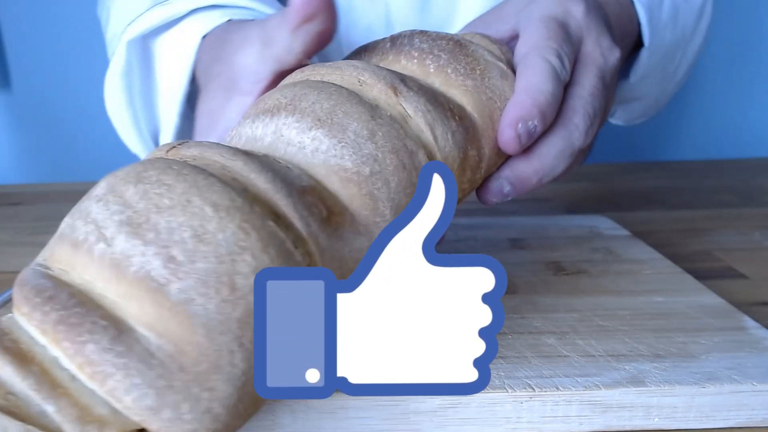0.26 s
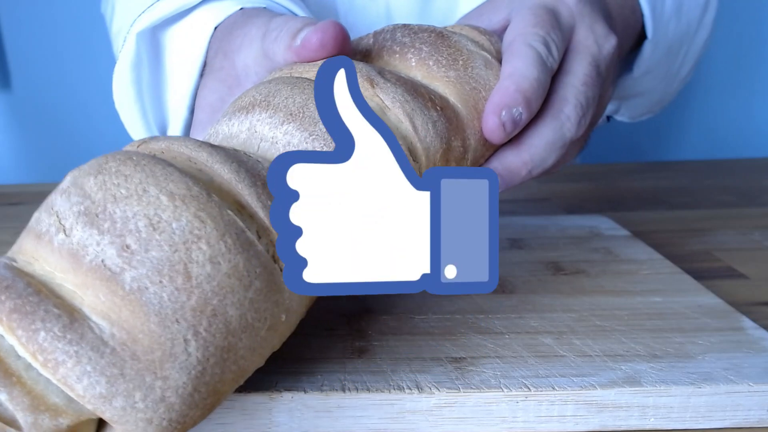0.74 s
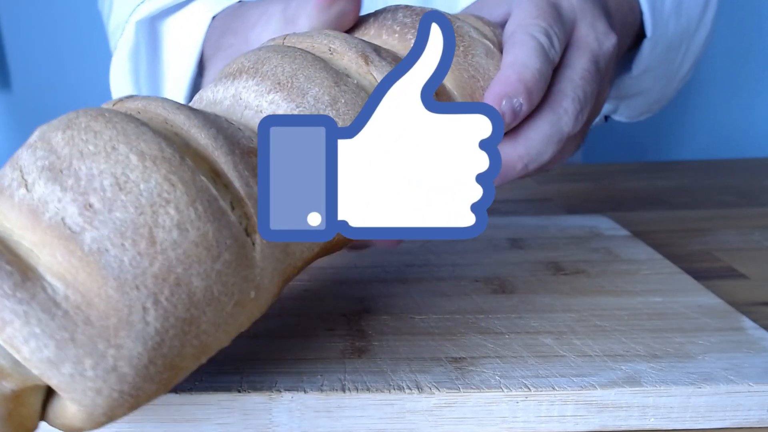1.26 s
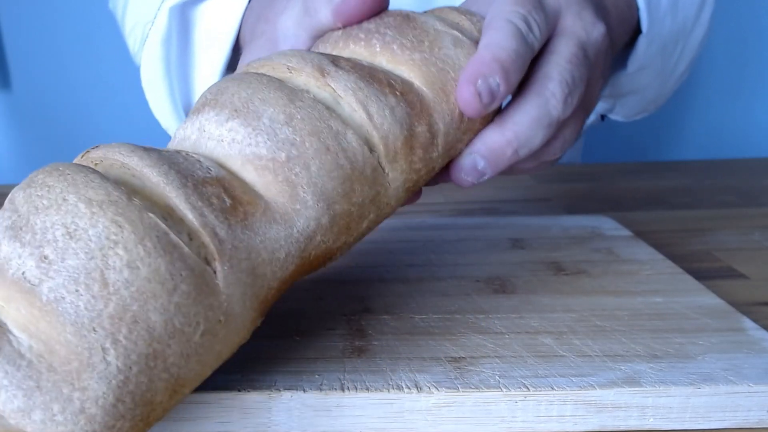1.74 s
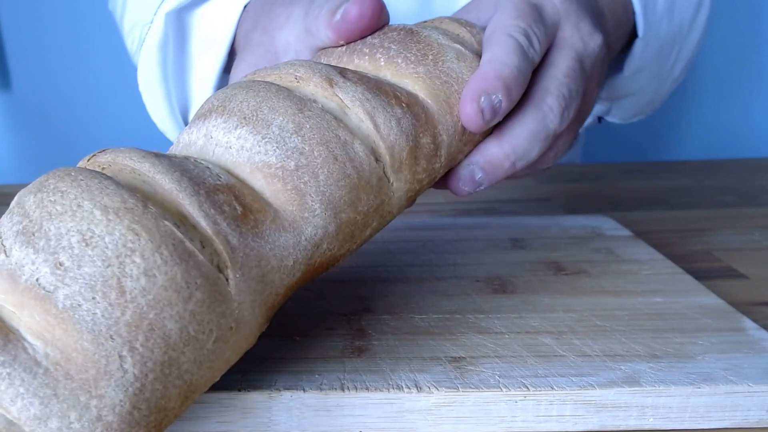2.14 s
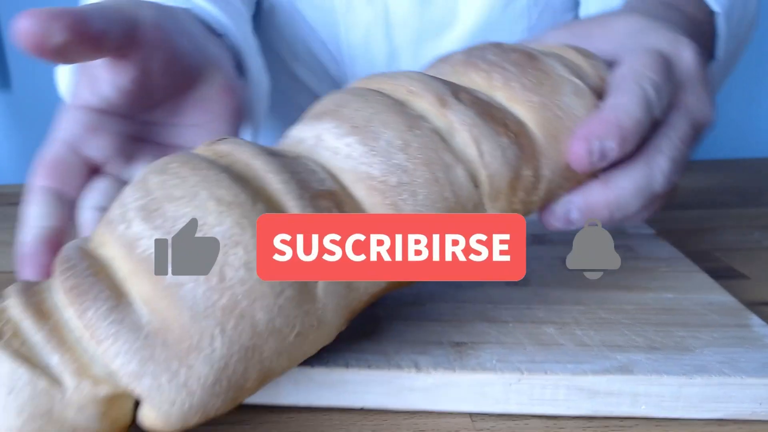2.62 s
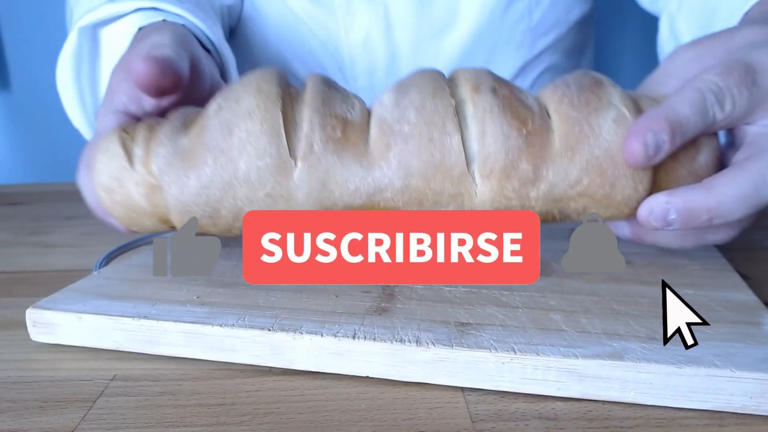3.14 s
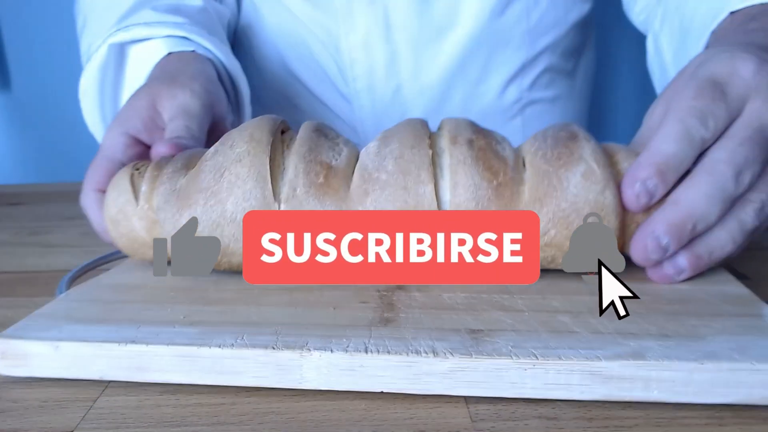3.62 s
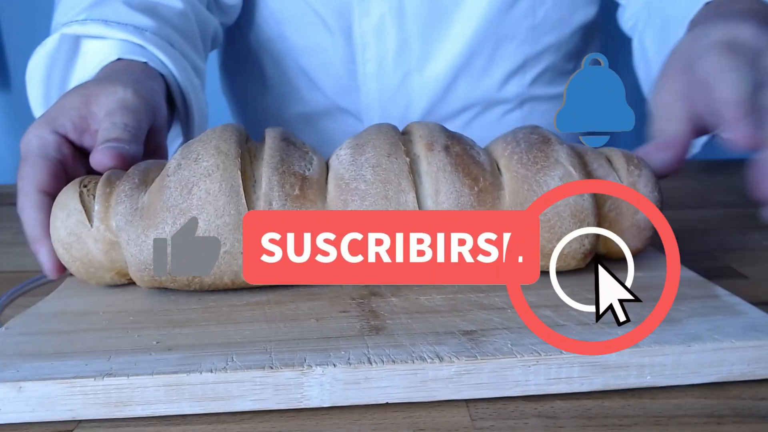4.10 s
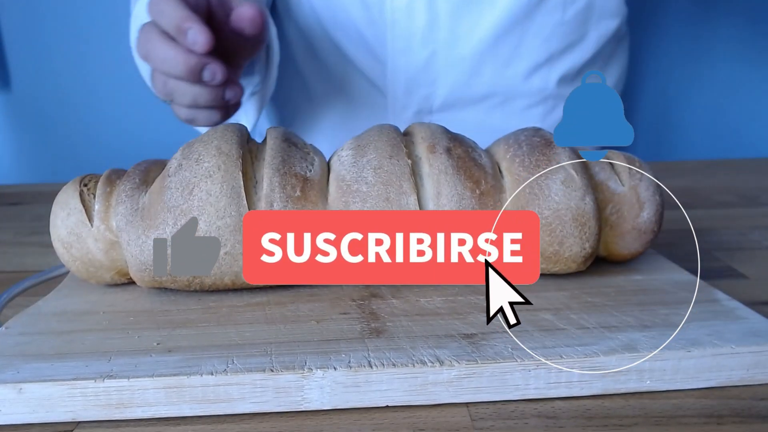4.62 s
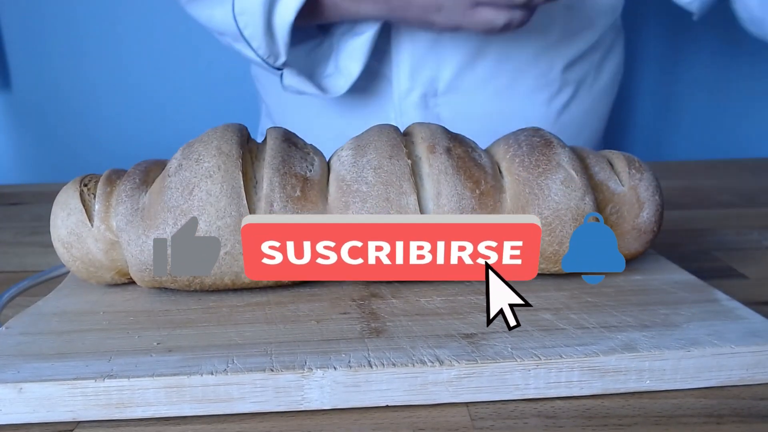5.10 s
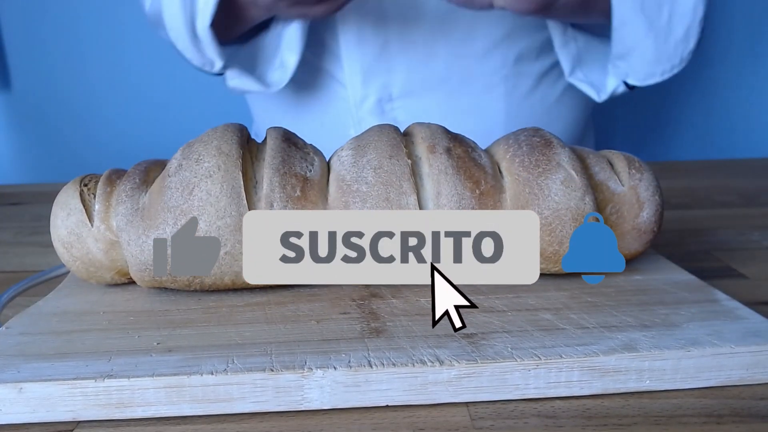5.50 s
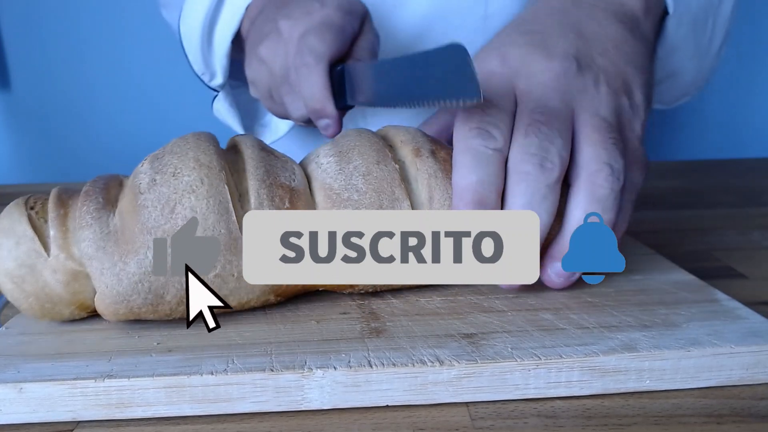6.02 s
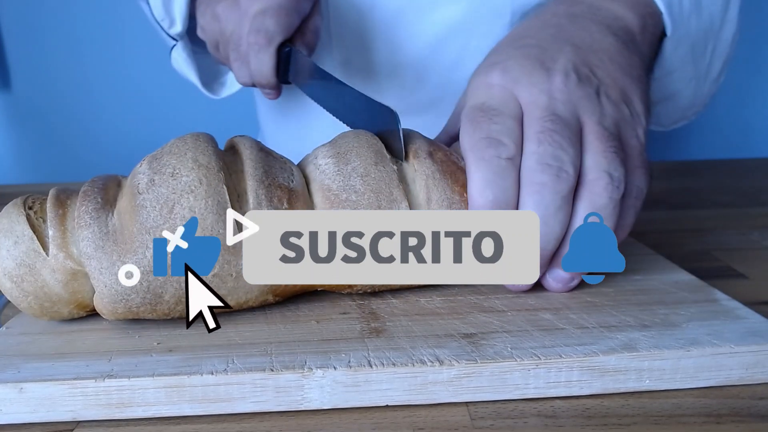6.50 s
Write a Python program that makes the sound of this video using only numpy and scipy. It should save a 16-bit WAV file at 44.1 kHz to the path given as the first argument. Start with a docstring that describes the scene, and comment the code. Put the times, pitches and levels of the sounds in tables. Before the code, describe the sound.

Close microphone in a small kitchen. Fingers rap a quick hollow roll on a crusty loaf, then squeezing brings bright, irregular crackles and one sharper crunch. A louder roll of taps follows, and a second, finer crackle. The loaf scrapes as it is turned, bumps down on a wooden board and shifts. A knife rattles faintly as it is picked up, a palm brushes the crust, and serrated teeth begin rasping in two growing strokes.

```python
"""A crusty loaf on a wooden board in a small kitchen, heard close up.
First fingers drum on the hollow loaf (damped bursts and soft blows), then squeeze it until the crust
crackles (random tiny fractures). More drumming and squeezing follow; the loaf slides as it is turned,
is set down and tapped. A knife knocks and scrapes as it is picked up (slips ringing its resonances),
a palm settles on the loaf, and the serrated edge starts to saw into the crust (slips grouped by teeth)."""
import sys
import numpy as np
from scipy import signal
from scipy.fft import rfft, irfft
from scipy.io import wavfile

SR = 44100
rng = np.random.default_rng(int(sys.argv[2]) if len(sys.argv) > 2 else 0)


def wav_record(signal):
    """Record a signal, one row per channel, as 16-bit PCM in the file named by sys.argv[1]."""
    frames = np.transpose(np.atleast_2d(signal))
    bounded = np.clip(frames, -1, 1)
    # unit amplitude maps onto the largest positive 16-bit level
    quanta = np.round(bounded * 32767).astype(np.int16)
    wavfile.write(sys.argv[1], SR, quanta)


N = 297675
TIME = np.arange(N) / SR   # seconds

# In the tables below, levels are relative: the functions also set an overall level for each layer.


def from_db(db):
    """Turn decibels into gain."""
    return 10 ** (np.asarray(db) / 20)


def rms_one(x):
    """Scale a signal to rms 1."""
    return x / np.sqrt(np.mean(x ** 2) + 1e-20)


def at_hz(points, hz):
    """Read a table between its points, on a log-frequency axis."""
    known_hz, values = np.transpose(points)
    return np.interp(np.log(np.maximum(hz, 1)), np.log(known_hz), values)


def drift(rate):
    """Random wandering: draws of spread 1, this many per second, joined by straight lines."""
    knots = rng.standard_normal(4096)
    return np.interp(TIME * rate, np.arange(len(knots)), knots)


def pulse(spectrum, size=4096):
    """The most compact causal pulse with this spectrum (minimum phase); peak 1."""
    gains = from_db(at_hz(spectrum, np.fft.rfftfreq(size, 1 / SR)))
    cepstrum = irfft(np.log(gains))
    # folding the cepstrum forward in time makes the pulse causal
    cepstrum[1:size // 2] *= 2
    cepstrum[size // 2 + 1:] = 0
    shape = irfft(np.exp(rfft(cepstrum)))
    return shape / np.abs(shape).max()


def through(x, response):
    """Pass a signal through an impulse response."""
    return signal.oaconvolve(x, response)[:N]


def coloured(x, spectrum):
    """Give a steady excitation a colour; rms 1."""
    return rms_one(through(x, pulse(spectrum)))


def add(track, s, sound):
    """Mix a sound into a track at a time in seconds."""
    start = max(round(s * SR), 0)
    track[start:start + len(sound)] += sound[:max(N - start, 0)]


def blows(times, levels_db):
    """One single-sample click per blow."""
    clicks = np.zeros(N)
    places = np.clip(np.round(times * SR).astype(int), 0, N - 1)
    clicks[places] = from_db(levels_db)
    return clicks


def fading(times, levels_db, decay_s):
    """An envelope that jumps at each contact and dies away exponentially."""
    keep_per_sample = np.exp(-1 / (decay_s * SR))
    return signal.lfilter([1], [1, -keep_per_sample], blows(times, levels_db) + 1e-18)


def burst(hz, cycles, size=1024):
    """A heavily damped piece of crust: swells for some cycles and soon dies; envelope peak 1."""
    turns = np.arange(size) / SR * hz
    envelope = turns / cycles * np.exp(1 - turns / cycles)
    return envelope * np.sin(2 * np.pi * turns)


def grains(per_s, spread_db):
    """Random tiny fractures of uneven size and either sign; rms 1."""
    sizes = from_db(spread_db * np.minimum(rng.exponential(1, N), 4))
    signs = rng.choice([-1, 1], N)
    return rms_one(sizes * signs * (rng.random(N) < per_s / SR))


def swell(start_s, attack_s, hold_s, release_s):
    """One movement of the hand: pressure builds, holds and eases along a power curve; peak 1."""
    rising = (TIME - start_s) / attack_s
    easing = (start_s + attack_s + hold_s + release_s - TIME) / release_s
    return np.clip(np.minimum(rising, easing), 0, 1) ** 1.9


def moves(rows):
    """A gain over time for each level column of a table of movements."""
    return sum(np.outer(from_db(row[4:]), swell(*row[:4])) for row in rows)


# Colour of the room air: (frequency [Hz], level [dB])
AIR_COLOUR = [(12, -33.5), (20, 7.5), (44, 5), (57, -9), (92, -10), (211, -10.5), (669, -21.5), (1280, -32),
              (2230, -30.5), (3010, -35.5), (6070, -35.5), (7420, -40.5), (8000, -55), (10400, -89),
              (17600, -120)]
# Low hum of the room: (frequency [Hz], level [dB])
HUM = [(26.5, -52), (47, -54.5), (100, -67)]
# Arm movements that rustle the sleeves:
# (start [s], attack [s], hold [s], release [s], level [dB])
SLEEVES = [(0, .14, .06, .3, -55), (2.6, .5, .35, .5, -55.5), (4.35, .3, .1, 1.7, -54),
           (5.45, .22, .03, .4, -55.5)]
# Colour of rustling cloth: (frequency [Hz], level [dB])
CLOTH = [(120, -33), (200, -5), (388, -9.5), (467, -3), (580, -8.5), (1290, -8.5), (2190, -19.5),
         (3030, -14.5), (6060, -33), (8000, -55), (10400, -68), (17600, -120)]
SLEEVES_REST_DB = -66   # faint rustle that never stops


def background(air_db, sleeves_db):
    """Room air, a wavering low hum and sleeves: noise coloured for air and cloth, plus sines."""
    air = from_db(air_db) * coloured(rng.standard_normal(N), AIR_COLOUR)
    hum = np.zeros(N)
    for hz, db in HUM:
        phase = 2 * np.pi * hz * TIME + 0.66 * drift(1.7)
        hum += np.sqrt(2) * from_db(db) * np.sin(phase)
    moving = from_db(sleeves_db) * moves(SLEEVES)[0]
    rustle = np.hypot(from_db(SLEEVES_REST_DB), moving)
    return air + hum + rustle * coloured(rng.standard_normal(N), CLOTH)


# How long the kitchen's tail lasts: (frequency [Hz], time to fall by 60 dB [s])
ROOM_T60 = [(100, .5), (260, 0.45), (700, 0.37), (1840, 0.38), (4850, 0.14)]
# How strong the tail is: (frequency [Hz], level [dB])
ROOM_LEVEL = [(60, -4.5), (200, -6.5), (900, -5.5), (1800, -12), (4000, -9.5), (8000, -21.5)]


def kitchen(x, first_echo_s):
    """Many mixed reflections: bands of noise that die away, soonest in the high treble."""
    t, tail = TIME[:SR * 3 // 4], 0
    edges = 40 * 2 ** np.arange(0, 8.5, .5)   # half-octave bands
    for low, high in zip(edges, edges[1:]):
        hz = np.sqrt(low * high)
        band_pass = signal.butter(2, [low, high], "band", fs=SR, output="sos")
        band = signal.sosfilt(band_pass, rng.standard_normal(len(t)))
        decay = np.exp(-np.log(1000) * t / at_hz(ROOM_T60, hz))
        build_up = 1 - np.exp(-(t / first_echo_s) ** 2)
        gain = np.sqrt(2 * (high - low) / SR / len(t)) * from_db(at_hz(ROOM_LEVEL, hz))
        tail = tail + rms_one(band * decay * build_up) * gain
    return through(x, tail)


# Ringing of loaf and board: (frequency [Hz], level [dB], time to fall by 60 dB [s])
BOARD_MODES = [(68.4, -7.5, .3), (103, -5, .2), (144.75, 5, 0.52), (196.5, -0.5, 0.2), (225, -3, 0.32),
               (262.3, -1, 0.4), (377, -25.5, 0.42), (435, 4.5, 0.22), (462, -10, 0.5), (529.6, -15, 0.2),
               (515, -6.5, .3), (603.5, 2.5, .25), (817, -16, .26), (891, -1, .27), (1003, -5.5, 0.27),
               (1009, -3.5, .25), (1190, -9.5, .2), (1415, -10, 0.23), (1616, -10, .2), (1690, -4, .18),
               (1700, -5.5, .18)]


def board(x, level_db):
    """Loaf and board ring on, as fading sines, after whatever shakes them."""
    t = TIME[:SR // 2]
    ringing = sum(from_db(db - 60 * t / t60) * np.sin(2 * np.pi * hz * t) for hz, db, t60 in BOARD_MODES)
    return from_db(level_db) * through(x, ringing)


# The knife knocks as it is picked up, further away: (time [s], level [dB])
KNIFE_KNOCKS = [(4.515, -31.5), (4.575, -32), (4.629, -31), (4.668, -42), (4.802, -32)]
# The knife scrapes as it is lifted: (start [s], attack [s], hold [s], release [s], level [dB])
KNIFE_LIFT = (4.76, .06, .04, .05, -37.5)
# It hisses as its edge slips off: (start [s], attack [s], hold [s], release [s], level [dB])
KNIFE_SLIP = (4.825, .03, .006, .045, -38.5)
# The knife's own resonances: (frequency [Hz], width [Hz], level [dB])
KNIFE_MODES = [(764, 25, -3), (1154, 31, -1), (1360, 24, -2), (1640, 23, -8), (1857, 28, 0), (2070, 27, 1),
               (2504, 22, 2.5), (3520, 17, -21)]
# Colour of rough, crushing contact, also used for the crust: (frequency [Hz], level [dB])
CRUNCH = [(100, -6), (420, 3.5), (950, 3.5), (1700, 2), (2400, 0.5), (3200, -12.5), (4400, -21.5),
          (8000, -38.5)]
# Colour of a hissing surface, also used for the crust: (frequency [Hz], level [dB])
HISS = [(1000, -35.5), (2500, -7.5), (3600, 14.5), (4900, 7), (6000, 5), (7200, 1), (8000, -19.5)]


def knife_pickup(knock_db, rattle_s, scrape_db, rough_db):
    """Tiny slips ring the blade: it knocks and rattles, then scrapes as it is lifted."""
    times, levels_db = np.transpose(KNIFE_KNOCKS)
    scrape = from_db(scrape_db) * moves([KNIFE_LIFT])[0]
    hiss = from_db(scrape_db) * moves([KNIFE_SLIP])[0]
    slips = grains(per_s=5000, spread_db=1.0)
    ring = np.zeros(N)
    for hz, width, db in KNIFE_MODES:
        ring += from_db(db) * signal.lfilter(*signal.iirpeak(hz, hz / width, fs=SR), slips)
    rough = from_db(rough_db) * coloured(slips, CRUNCH)
    contact = fading(times, levels_db + knock_db, rattle_s) + scrape
    return contact * (rms_one(ring) + rough) + hiss * coloured(slips, HISS)


# Colour of the shaken body of the loaf: (frequency [Hz], level [dB])
BODY = [(25, -6.5), (55, 0.5), (90, -14.5), (145, -0.5), (230, 4.5), (340, -6.5), (600, -26), (3000, -59.5)]


def rubbing(pressures, slips, rasp_colour):
    """Slips on the rough crust shake the loaf (body), its shell (rasp) and its surface (hiss)."""
    # slips are too brief to heave the whole loaf, so the deepest bass is removed
    slips = signal.sosfilt(signal.butter(2, 65, "high", fs=SR, output="sos"), slips)
    colours = (BODY, rasp_colour, HISS)
    return sum(gain * coloured(slips, colour) for gain, colour in zip(pressures, colours))


# The loaf slides as it is turned, set down, pushed into place and let go:
# (start [s], attack [s], hold [s], release [s], body [dB], rasp [dB], hiss [dB])
SLIDES = [(2.3, .12, .06, .15, -48, -50, -61), (2.41, .3, .05, .18, -38, -30, -42.5),
          (3.37, .045, .02, .06, -57, -46, -57), (3.485, .06, .05, .12, -40, -37, -39.5),
          (3.53, .16, .06, .24, -33, -28.5, -34.5), (3.635, .025, .05, .05, -27, -31, -45),
          (4.0, .035, .015, .1, -43, -59, -61)]
# Colour of the sliding crust: (frequency [Hz], level [dB])
SLIDE_RASP = [(150, -18.5), (420, -10.5), (600, -3.5), (760, -8.5), (1000, -4.5), (1220, -6.5), (1550, -2),
              (2050, -0.5), (2400, -6), (2900, -16.5), (4000, -18.5), (8000, -38.5)]
# A palm settles on the loaf:
# (start [s], attack [s], hold [s], release [s], body [dB], rasp [dB], hiss [dB])
GRIP = [(5.85, .14, .04, .12, -39.5, -37.5, -45)]
# Colour of a palm brushing the crust: (frequency [Hz], level [dB])
PALM_RASP = [(150, -22), (420, -5.5), (620, 7), (900, -3.5), (1300, 0.5), (2100, -1), (2900, -9),
             (4500, -24), (6000, -18), (8000, -40)]


def sliding(level_db, palm_db, uneven_db):
    """Hands and board slide over the bumpy crust in dense tiny slips that come in clumps."""
    slips = grains(per_s=6000, spread_db=2.5)
    slips = slips * from_db(2.2 * drift(110)) * from_db(uneven_db * drift(30))
    slides = from_db(level_db) * rubbing(moves(SLIDES), slips, SLIDE_RASP)
    palm = from_db(palm_db) * rubbing(moves(GRIP), slips, PALM_RASP)
    return slides + palm


# Knife strokes, a light touch, then out and back:
# (start [s], attack [s], hold [s], release [s], rasp [dB])
STROKES = [(6.1, .03, .02, .07, -47), (6.14, .26, .03, .14, -35), (6.48, .23, .015, .1, -26.5)]
# Colour of the saw's rasp: (frequency [Hz], level [dB])
SAW_RASP = [(150, -20), (400, -1.5), (750, 3.5), (1100, 0), (1600, -1), (2100, -7), (2700, -13.5),
            (8000, -32)]
SAW_BODY_DB, SAW_HISS_DB = -5, -10   # shaking loaf and hissing surface, against the rasp


def sawing(teeth_per_s):
    """Teeth catch one after another at a wandering pace, each tearing off a clump of grains."""
    teeth = np.cumsum(teeth_per_s * from_db(2.5 * drift(25))) / SR
    catching = from_db(4 * np.cos(2 * np.pi * teeth))
    bites = grains(per_s=2400, spread_db=3.8) * catching
    push = moves(STROKES)[0]
    pressures = (from_db(SAW_BODY_DB) * push, push, from_db(SAW_HISS_DB) * push)
    return rubbing(pressures, bites, SAW_RASP)


# The crust caves in under the thumbs:
# (start [s], attack [s], hold [s], release [s], body [dB], rasp [dB], hiss [dB])
GIVE_WAY = [(0.89, .018, .005, .17, -48, -35, -33)]


def caving_in(level_db):
    """The crust gives way in sparse, very uneven fractures that shake the loaf."""
    fractures = grains(per_s=1100, spread_db=7.5)
    return from_db(level_db) * rubbing(moves(GIVE_WAY), fractures, CRUNCH)


# Soft blows of fingers and board on the loaf, and the low knock of the knife at 4.55 s: # (time [s], thump
# level [dB], slap level [dB])
THUDS = [(0.2473, -21, -14), (0.256, -22, -16), (0.27, -22, -7), (0.289, -15, -12), (0.307, -21, -7),
         (0.9013, -26, -18), (1.204, -38, -42), (1.478, -21, -10), (1.487, -14.5, -8), (1.499, -16, -8),
         (1.512, -16, -7), (1.531, -14, -8), (1.542, -19, -19), (2.383, -36, -36), (3.51, -31, -39),
         (3.667, -29, -8), (3.69, -22, -16), (4.028, -32, -44), (4.1783, -19, -14.5), (4.55, -36, -55),
         (6.1189, -23, -37), (6.2113, -20.5, -38), (6.248, -21, -42), (6.4, -26, -35)]
# Colour of the pushed crumb: (frequency [Hz], level [dB])
THUMP = [(20, -6.5), (45, -1.5), (100, -4.5), (160, -1.5), (260, -2), (400, -17), (1000, -37), (8000, -89)]
# Colour of the slapped crust: (frequency [Hz], level [dB])
SLAP = [(60, -14.5), (250, -11.5), (430, -0.5), (620, 5.5), (780, -9.5), (1000, -13.5), (1300, -5.5),
        (2500, -19.5), (4500, -40.5), (8000, -53)]
CRUNCH_FOLLOWS = 1.1   # dB of crushed surface per dB of slap: harder blows crush more


def thuds(slap_db, crunch_db, crunch_s):
    """A soft blow pushes the crumb, slaps the crust and crushes its surface for a moment."""
    times, thumps_db, slaps_db = np.transpose(THUDS)
    thump = through(blows(times, thumps_db), pulse(THUMP))
    slap = through(blows(times, slaps_db + slap_db), pulse(SLAP))
    crushing = fading(times, CRUNCH_FOLLOWS * slaps_db + crunch_db, crunch_s)
    crunch = crushing * coloured(grains(per_s=6000, spread_db=-1.5), CRUNCH)
    return thump - slap + crunch


# Fingers clacking on the hard crust: (time [s], ring level [dB], snap level [dB])
CLACKS = [(0.2679, -13, -42), (0.271, -6.5, -17), (0.289, -4, -21), (0.2921, -9, -37), (0.3084, -3, -12),
          (0.3241, -16, -44), (1.4987, 1.5, -29), (1.5134, 7, -14), (1.5222, -9, -28), (1.5312, -3.5, -20),
          (1.542, -4, -22), (1.5518, -16, -22), (3.091, -26, -45), (3.6678, -14, -23), (3.6745, 3, -13),
          (4.1783, -7, -36)]
# a harder clack rings higher and shorter: values at 0 dB and their change per dB
CLACK_HZ, CLACK_HZ_PER_DB = 1820, 14
CLACK_CYCLES, CLACK_CYCLES_PER_DB = 0.76, -0.009


def clacks(ring_db, low_db, low_hz, low_lag_s):
    """Bending waves in the crust: the main ring comes first, the slower low wave just after."""
    out = np.zeros(N)
    for s, level_db, _ in CLACKS:
        hz = CLACK_HZ + CLACK_HZ_PER_DB * level_db
        cycles = CLACK_CYCLES + CLACK_CYCLES_PER_DB * level_db
        varied_low_hz = low_hz * from_db(rng.normal(0, 1.0))
        # the ring starts early so that its envelope peaks at the listed time
        add(out, s - cycles / hz, from_db(level_db + ring_db) * burst(hz, cycles))
        add(out, s + low_lag_s, from_db(level_db + low_db) * burst(varied_low_hz, cycles))
    return out


def snaps(snap_db, snap_hz, cycles, lead_s):
    """The fastest bending waves arrive ahead of each clack as a treble snap."""
    out = np.zeros(N)
    for s, _, treble_db in CLACKS:
        varied_hz = snap_hz * from_db(rng.normal(0, 1.0))
        add(out, s - lead_s, from_db(treble_db + snap_db) * burst(varied_hz, cycles))
    return out


# The loudest flakes of crust snapping, and the ticks of the knife tip touching down at 6.12 and 6.21 s: # (time
# [s], flake level [dB], knock level [dB])
CRACKS = [(0.4336, -26, -23), (0.4864, -40, -40), (0.5972, -31, -39), (0.6375, -22, -55),
          (0.6589, -30, -27), (0.6823, -18, -27), (0.7359, -19, -28), (0.7863, -27, -50),
          (0.8383, -20, -43), (0.9022, -13, -2.5), (0.922, -16, -33), (0.9493, -20, -38),
          (0.9633, -22, -35), (0.9932, -18, -40), (1.7963, -35, -46), (1.8267, -29, -47),
          (1.8383, -20, -52), (1.8466, -24, -52), (1.8794, -15.5, -31), (1.9049, -19, -55),
          (1.9441, -22, -26), (1.963, -23, -47), (2.0118, -20, -52), (2.0252, -22, -31), (2.084, -23, -29),
          (2.186, -27, -47), (2.4802, -35, -26), (6.1204, -38, -36), (6.2113, -39, -36),
          (6.3245, -27.5, -33), (6.3729, -23, -21), (6.4112, -15.5, -16), (6.7257, -26, -20)]
# Colour of a breaking flake's tick: (frequency [Hz], level [dB])
FLAKE = [(60, -12), (300, -24.5), (900, 6.5), (1600, -13), (3400, -2.5), (5500, 11), (8000, -2.5)]
# Colour of the knock on the shell beneath: (frequency [Hz], level [dB])
KNOCK = [(40, -9.5), (150, 0), (500, -2), (1100, -1.5), (2200, -3.5), (4000, -15.5), (8000, -28)]
FLAKE_HZ, FLAKE_SPREAD_OCTAVES = 4650, 0.13   # flakes differ a little in size, and so in pitch


def cracks(ring_db, tick_db, knock_db, cycles):
    """A flake breaks with a broad tick, rings very briefly and knocks the shell beneath."""
    out, tick, knock = np.zeros(N), pulse(FLAKE), pulse(KNOCK)
    for s, level_db, low_db in CRACKS:
        hz = FLAKE_HZ * 2 ** (FLAKE_SPREAD_OCTAVES * rng.standard_normal())
        add(out, s, from_db(level_db + ring_db) * burst(hz, cycles))
        add(out, s, from_db(level_db + tick_db) * tick)
        add(out, s, from_db(low_db + knock_db) * knock)
    return out


# Squeezing the loaf: (start [s], attack [s], hold [s], release [s], fine crackle level [dB])
SQUEEZES = [(0.565, .08, .1, .13, -45.5), (0.76, .1, .13, .07, -45), (1.16, .05, .005, .11, -55),
            (1.72, .2, .05, .36, -49.5), (2.3, .06, .06, .15, -63)]
# Colour of fine crumbs breaking off the crust: (frequency [Hz], level [dB])
CRUMBS = [(100, -20), (900, -8), (1600, -9), (3400, -0.5), (5500, -5), (8000, -6.5)]


def crackle(level_db, shower_db, shower_s):
    """Pressure breaks many smaller flakes, and each loud crack sets off a short shower of them."""
    times, cracks_db, _ = np.transpose(CRACKS)
    squeezing = from_db(level_db) * moves(SQUEEZES)[0]
    showers = fading(times, cracks_db + shower_db, shower_s)
    fractures = grains(per_s=1000, spread_db=5)
    return (squeezing + showers) * coloured(fractures, CRUMBS)


def scene():
    """Blows, cracks and friction sound directly, through the board and through the room."""
    knife = knife_pickup(knock_db=-12.5, rattle_s=0.015, scrape_db=-7.5, rough_db=2)
    slides = sliding(level_db=-1.5, palm_db=-2, uneven_db=0.9)
    saw = sawing(teeth_per_s=110)
    collapse = caving_in(level_db=-4.5)
    friction = collapse + slides + saw
    bumps = thuds(slap_db=-1.5, crunch_db=-11, crunch_s=0.0085)
    taps = clacks(ring_db=-1.5, low_db=-12.5, low_hz=1014, low_lag_s=0.00043)
    leading = snaps(snap_db=-3.5, snap_hz=3400, cycles=1.2, lead_s=.0015)
    crust = cracks(ring_db=4, tick_db=5, knock_db=1, cycles=0.5)
    crust = crust + crackle(level_db=3, shower_db=-25, shower_s=0.012)
    direct = taps + leading + bumps + crust + friction + knife

    ringing = board(bumps, level_db=-54) + board(taps, level_db=-56.5)
    ringing = ringing + board(collapse + saw + crust, level_db=-61.5) + board(slides, level_db=-63)

    # what each source sends into the room; the knife is further away, so it sends more
    spill = from_db(-6) * taps + from_db(-1) * bumps + from_db(-1.5) * crust
    spill = spill + from_db(-1.8) * friction + from_db(7.5) * knife
    spill = spill + from_db(1) * leading   # the treble snaps radiate widely
    room = kitchen(spill, first_echo_s=0.0022)
    return (direct + ringing + room + background(air_db=-50.5, sleeves_db=-1.5))[None]


CUTOFF_HZ = 7700


def record(dry):
    """The loudest peaks are rounded and the top treble is cut by two low-pass filters."""
    rounded = dry / (1 + (dry / .72) ** 4) ** .25
    softened = signal.sosfilt(signal.butter(8, CUTOFF_HZ, fs=SR, output="sos"), rounded)
    return signal.sosfilt(signal.ellip(6, .3, 40, CUTOFF_HZ, fs=SR, output="sos"), softened)


dry = scene()
out = record(dry)
wav_record(out)
```